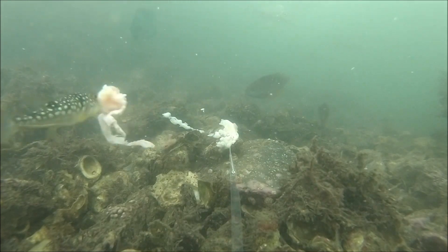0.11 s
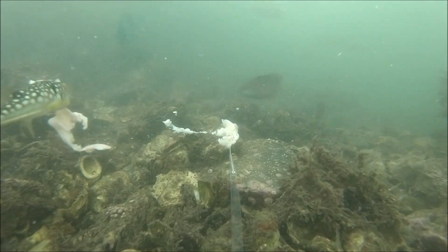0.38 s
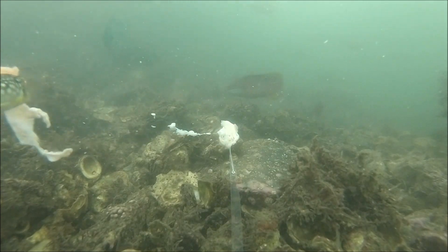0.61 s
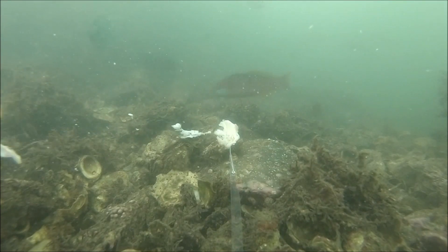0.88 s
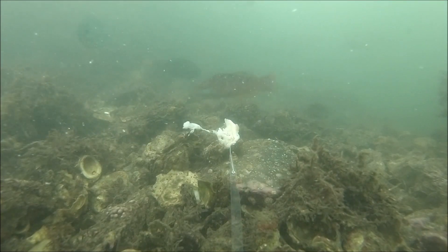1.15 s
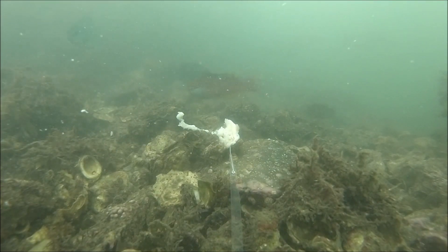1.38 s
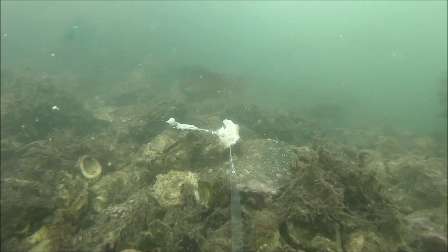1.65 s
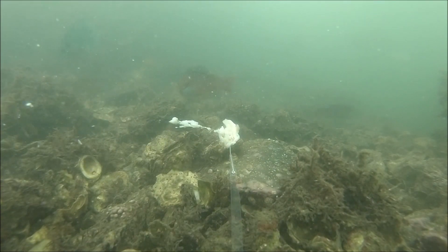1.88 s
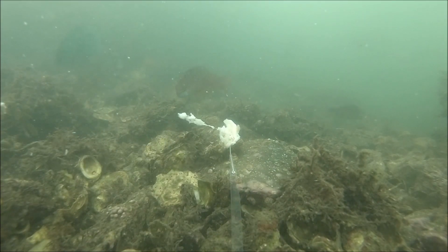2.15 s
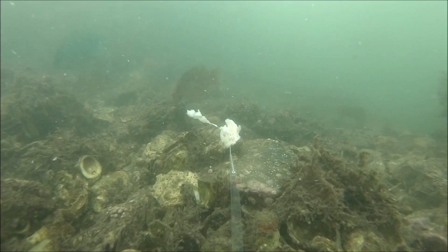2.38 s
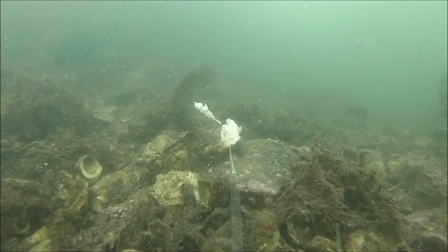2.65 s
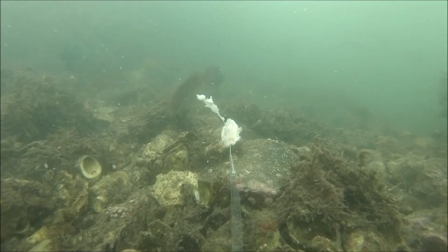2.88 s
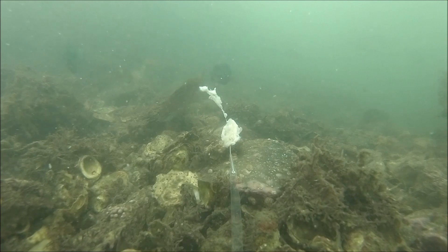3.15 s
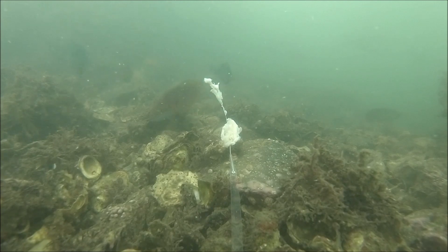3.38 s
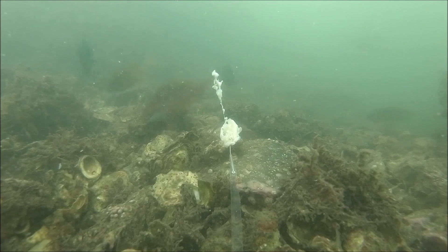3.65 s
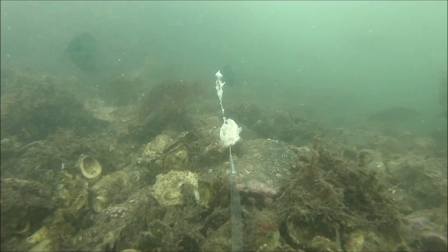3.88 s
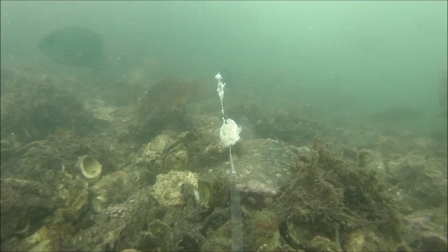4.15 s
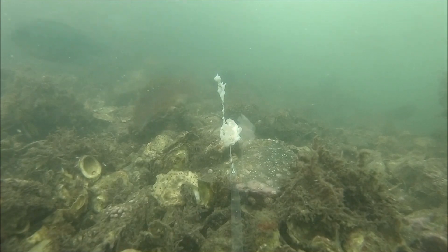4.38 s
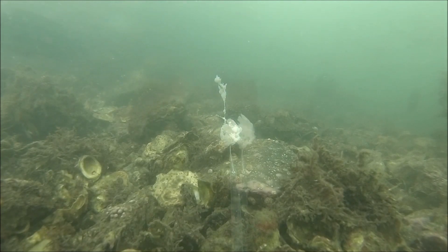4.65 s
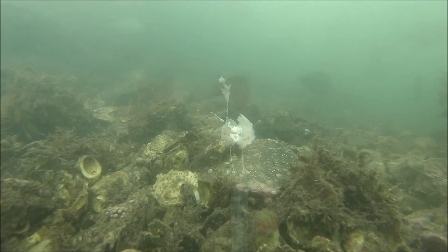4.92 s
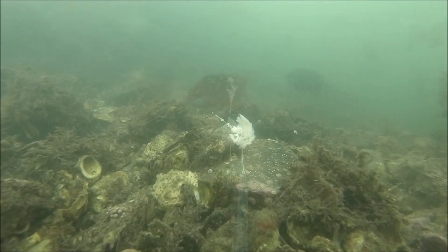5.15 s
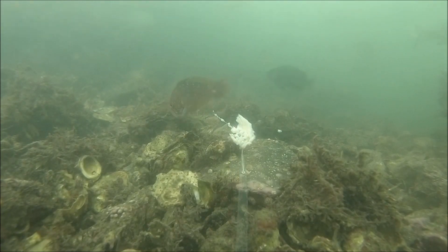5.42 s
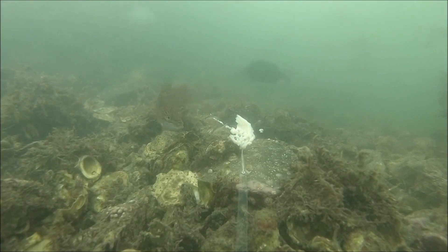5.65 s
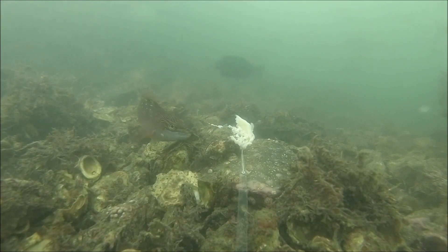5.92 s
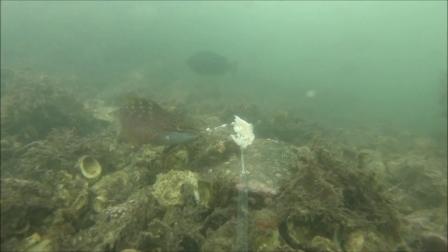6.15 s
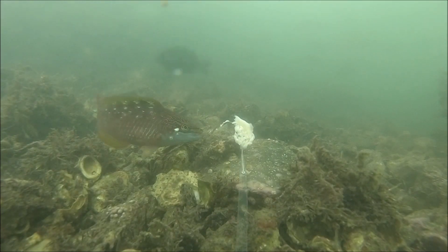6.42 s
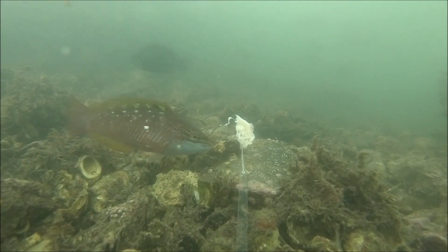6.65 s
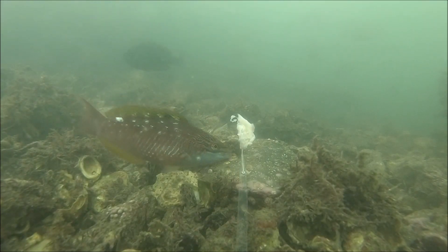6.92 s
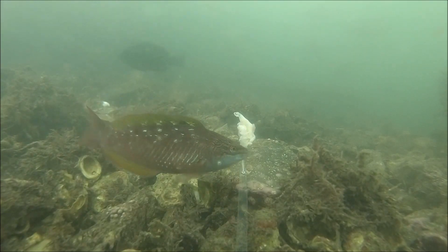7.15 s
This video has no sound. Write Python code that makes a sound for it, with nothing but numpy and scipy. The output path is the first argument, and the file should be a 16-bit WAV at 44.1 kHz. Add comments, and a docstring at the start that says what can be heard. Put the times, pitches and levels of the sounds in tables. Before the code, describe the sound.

Underwater on a shallow shell bed, nearby snapping shrimp fire hard, irregular clicks, the loudest around one second. Two soft low thumps fall near three seconds around a lull, then the snaps crowd together before thinning to faint ticks. Distant crackle, hiss and rumble continue throughout, heard in stereo from inside a sealed camera housing that gives each snap a short, boxy ring.

```python
"""Snapping shrimp over a shallow shell bed, heard by two microphones inside a sealed camera housing.
Near snaps crackle from the start, each a cluster of echoes that rings the housing; after the loudest, at 1 s,
the level dips briefly. Soft thumps fall at 2.9 and 3.6 s, on either side of a lull in the near snaps.
They crowd together from 4.2 to 5.6 s, then thin out as the hiss sinks. Throughout, far snaps tick and
blur into a hiss, over a wavering rumble and a faint two-tone hum, both shaped from noise and sines."""
import sys
import numpy as np
from scipy import signal
from scipy.fft import rfft, irfft, next_fast_len
from scipy.io import wavfile
from scipy.ndimage import uniform_filter1d

SR = 44100
rng = np.random.default_rng(int(sys.argv[2]) if len(sys.argv) > 2 else 0)


def amplitude_ratio(level_db):
    """Convert a level in decibels to the matching linear amplitude (field) ratio."""
    exponent = np.asarray(level_db, float) / 20
    return 10 ** exponent


def wav_record(signal):
    """Record a signal, one row per channel, as 16-bit PCM in the file named by sys.argv[1]."""
    frames = np.transpose(np.atleast_2d(signal))
    bounded = np.clip(frames, -1, 1)
    # unit amplitude maps onto the largest positive 16-bit level
    quanta = np.round(bounded * 32767).astype(np.int16)
    wavfile.write(sys.argv[1], SR, quanta)


N = 321489  # samples, 7.29 s
RING = 4096  # samples given to one snap or thump


def curve(hz, table, column=1):
    """Reads a table column over log frequency."""
    table = np.array(table)
    return np.interp(np.log(hz + 1e-9), np.log(table[:, 0]), table[:, column])


def mode(f, hz, width):
    """Response of one resonance, gain 1 at its centre."""
    return 1j * f * width / (hz ** 2 - f ** 2 + 1j * f * width)


def walk(rate):
    """Random levels held 1 / rate s and slewed twice, scaled to spread 1."""
    hold = int(SR / rate)
    steps = np.repeat(rng.standard_normal(N // hold + 1), hold)
    x = uniform_filter1d(uniform_filter1d(steps, hold), hold)[:N]
    return x / x.std()


def noise(gain):
    """Two unrelated noises of one colour, rms 1."""
    size = next_fast_len(N)
    spectrum = rfft(rng.standard_normal((2, size))) * gain(np.fft.rfftfreq(size, 1 / SR))
    x = irfft(spectrum, size)[:, :N]
    return x / x.std()


def colour(table):
    """Gain of a spectrum that closes at both ends of its table."""
    return lambda f: amplitude_ratio(curve(f, table)) * (f > table[0][0]) * (f < table[-1][0])


# Snaps close to the housing, each level as if its energy filled 5 ms, ahead of the port balance:
# (t/s, body ring level/dB, low ring over body/dB, treble ring over body/dB, echo spread/ms)
NEAR_SNAPS = [(0.0361, -59.5, -7, 19.0, 1.5), (0.1603, -21, -8.5, -25.5, 1.83),
              (0.2491, -29, -14.5, -9, 3.5), (0.2567, -40, 1, 11, 1.1), (0.2756, -42.5, -9.0, -5, 6.1),
              (0.2905, -44.5, -18.0, 6.5, 2.2), (0.432, -72, 27.5, 2.0, 5.1), (0.4855, -46.5, -3, 3, 3.4),
              (0.6622, -28.5, -12, -9, 2.5), (0.7129, -33.5, -12, -2, 3.3),
              (0.7254, -42.5, -18, -15.5, 3.7), (0.7721, -28, -19, -5, 2.1), (0.8637, -31, -16.5, -10, 3.7),
              (0.9037, -54, -9.0, 6.5, 3.6), (0.9286, -45.5, -2.5, 3.5, 2.9), (0.955, -52, -13, 0, 4.2),
              (0.9701, -19.5, -11.0, -9.5, 2.1), (1.0025, -41.0, -6, -10, 12), (1.025, -41.5, -5, 3, 10.3),
              (1.0434, -11, -8.5, -14.5, 1.2), (1.1358, -48.5, -13, -0.5, 2), (1.1975, -39.0, -32, 4, 2.3),
              (1.2073, -40, -13.0, -2, 3.7), (1.3074, -51, -3.0, 5, 1.6), (1.4403, -28.5, -10.5, -17, 3.1),
              (1.5053, -43.5, -6, -20, 3.3), (1.563, -27.5, -5.5, -17, 3.1), (1.591, -47, -25, 5.5, 1.4),
              (1.5972, -49.5, -9, 7.5, 2.2), (1.7372, -44.5, 3, 1.5, 5.9), (1.7496, -12, -10, -18, 1.3),
              (1.9123, -57, -10.0, 7.5, 5.3), (2.0376, -31, -8, -19, 2.8), (2.0446, -34.5, -19, -0.5, 3.2),
              (2.2331, -53.5, -30, 5, 3.6), (2.293, -48.5, -5, -22, 7.8), (2.3135, -52.5, -7, 11.5, 2.1),
              (2.372, -20.0, -3, -8.5, 2.9), (2.7062, -27, -16, -9.5, 3.4), (2.7369, -34, -5.5, -16, 3.9),
              (2.7776, -38, -12, -8.5, 6.6), (2.8207, -48, -6, 0.5, 3.0), (2.8417, -37, -11.5, 1.0, 1.6),
              (2.8832, -40, -18, -4, 2.2), (2.8912, -33.5, -18, 0.5, 3), (2.9201, -41, -19.5, -9, 3.5),
              (2.934, -27.0, -20.5, -3, 2.7), (2.9959, -52.5, -10.0, 2, 4.8),
              (3.544, -58.5, 11.5, -12, 5.5), (3.5803, -33, -9.5, 1.5, 1.24), (3.6771, -37, -14, -1, 4.3),
              (3.7121, -25.5, -6, -6.5, 3.2), (3.7412, -53.0, -1.0, 8, 1.8), (3.749, -56, 5, 14, 5.7),
              (3.7791, -40.5, -6.5, -2.5, 3.4), (3.864, -62, -18, 15, 2.7), (4.0136, -53.5, -18, 5, 2),
              (4.1183, -71.5, 23.5, 19, 7.1), (4.2253, -46, 2.0, 4.5, 1.3), (4.2357, -26.5, -7.5, -15, 2.3),
              (4.3153, -67, 12, 12, 6.1), (4.3266, -49, -1, -1.0, 2.1), (4.3791, -20.5, -8, -19, 1.8),
              (4.3832, -27.5, -15, -0.5, 1.6), (4.4115, -43.5, -1.5, -6, 7.7),
              (4.4268, -19, -7.5, -8, 2.76), (4.4863, -26.5, -13.5, -5, 2.2),
              (4.5383, -46.5, -3.5, 4.5, 3.1), (4.5475, -31.5, -12.5, -10, 4.6),
              (4.5811, -19.5, -4.5, -20.5, 1.44), (4.589, -34.0, 2, -0.5, 2.3), (4.596, -32, 5.5, -2, 7.9),
              (4.6103, -27.5, 1.5, -8, 4), (4.6559, -43.5, -2.5, 8.5, 2.3), (4.6766, -51.0, -5, 2.5, 11.1),
              (4.702, -68.5, 20, 14.5, 8.6), (5.0027, -46.0, 4.5, 3, 3.6),
              (5.0208, -23, -11.5, -15.5, 0.78), (5.0456, -46.5, -12, 1, 3.8),
              (5.0763, -27, -22.5, -1.5, 1.7), (5.2156, -36.5, -7.5, -3.5, 4.5),
              (5.231, -40, -20, -14.0, 2.7), (5.2353, -26.5, -16.5, -7, 2.4), (5.251, -36.5, -4, -6, 16),
              (5.2652, -29.5, -8, 0.0, 1.9), (5.2989, -53.5, 7, 10, 3.7), (5.3461, -35.5, -1, -2, 5),
              (5.3743, -21, -6.5, -9, 2.5), (5.3873, -22.5, -10.5, -10, 1.4), (5.4712, -43, -1, -2, 10),
              (5.4818, -32.5, -24.5, -4, 3.3), (5.4878, -40, -13, 4.5, 3.9), (5.512, -46, -6, -21, 8.6),
              (5.5257, -34.5, -22, -6.0, 4.9), (5.588, -53.5, -0.5, -19, 11),
              (5.6964, -38.5, -2.5, -6.0, 2.14), (5.818, -47.5, -15.5, 8, 2.2),
              (5.8811, -42, -26.5, -7.5, 2.7), (6.0168, -38, 0.5, -6, 2.1), (6.1879, -42, -14, 2.5, 2.3),
              (6.2027, -41, -27, 3.5, 3.4), (6.2754, -42.5, -16, 4.5, 3.2), (6.2912, -44.5, -9, 9.5, 3),
              (6.3139, -39.5, -22, -8, 2.0), (6.4115, -51, -10.0, -6.5, 3.9), (6.6193, -70.5, -10, 25, 2.1),
              (6.6229, -76.5, 0.5, 25, 6), (6.8367, -54.0, -15.5, 1, 6.7), (6.9652, -47.5, -8.5, 9.5, 1.23),
              (7.0543, -37.5, -17, -3.5, 2.7), (7.1352, -55, -15.5, 10, 1.4), (7.2394, -59.5, -4, 7.5, 4.6)]


def near_snaps():
    """Nearby shrimp: each snap is timed, levelled and given its own echo spread."""
    return snaps(NEAR_SNAPS)


def snaps(rows):
    """Arrivals of every snap ring three groups of housing modes, each brought to its own level."""
    f = np.fft.rfftfreq(RING, 1 / SR)
    groups = housing_modes(f)
    angle_db, top_hz = 2, 11000
    out = np.zeros((2, N + RING))
    for s, body_db, low_db, treble_db, spread_ms in rows:
        sound = arrivals(f, spread_ms)
        # the direction of the snap sets how strongly it drives each mode
        low, body, treble = (amplitude_ratio(angle_db * rng.standard_normal(len(modes))) @ modes for modes in groups)
        # a snap rich in lows rings the body lower, a bright one higher
        centre_hz = np.clip(2240 - 29.5 * low_db + 9.5 * treble_db, 1950, 2920)
        body = body * mode(f, centre_hz, 840)
        # each snap's top is softened by a random amount, more where its treble is weak
        dulling_db = 0.22 * min(treble_db, 0) + 4.0 * rng.standard_normal()
        treble = treble / (1 + 1j * f / (top_hz * amplitude_ratio(dulling_db)))
        start = int(s * SR)
        for db, ring in ((low_db, low), (0, body), (treble_db, treble)):
            part = irfft(sound * ring, RING)
            rms_5ms = np.sqrt(np.sum(part ** 2, axis=1, keepdims=True) / (SR / 200))
            out[:, start:start + RING] += amplitude_ratio(body_db + db) * part / rms_5ms
    return out[:, :N]


def arrivals(f, spread_ms, rise=0.32, pack=0.81, ragged_db=4.5, echo_db=3.5):
    """Spectrum of a ragged burst of arrivals off shells and surface, then a faint dull wash."""
    tail_db, tail_ms, tail_hz = -43, 20, 4000
    ms = np.arange(RING) * 1000 / SR
    grain, ragged, wash_grain = rng.standard_normal((3, 2, RING))
    echoes = np.repeat(ragged[0, ::32], 32)  # held 32 samples, the same at both microphones
    rough = grain * amplitude_ratio(ragged_db * ragged + echo_db * echoes)
    fade = np.exp(-(ms / (pack * spread_ms)) ** 0.79)
    burst = rough * fade * (1 - np.exp(-ms / (rise * spread_ms)))
    # snaps with a longer burst leave more wash, short ones hardly any
    wash = amplitude_ratio(tail_db) * min(spread_ms, 4.5) ** 2 * wash_grain * np.exp(-ms / tail_ms)
    return rfft(burst) + rfft(wash) / (1 + 1j * f / tail_hz)


# Resonances of the sealed housing in three groups, levels ahead of the wall and of each snap's scaling:
# (f/Hz, width/Hz, level/dB)
LOW_MODES = [(740, 370, -9.5), (1235, 230, -3.5)]
BODY_MODES = [(1805, 360, 16), (2350, 1000, 11.5), (2728, 1200, 1), (3000, 170, -14.5)]
TREBLE_MODES = [(5180, 1300, 22.5), (5900, 3000, 6), (8300, 830, -29), (11000, 5600, -29)]


def housing_modes(f):
    """Housing resonances behind walls that pass little between the groups and above the last one."""
    low_wall = mode(f, 1100, 710)
    body_wall = mode(f, 2450, 2200) ** 2
    treble_wall = mode(f, 7200, 4600) / (1 + 1j * f / 11000) ** 3
    walls = low_wall, body_wall, treble_wall
    return [wall * np.array([amplitude_ratio(db) * mode(f, hz, width) for hz, width, db in group])
            for wall, group in zip(walls, (LOW_MODES, BODY_MODES, TREBLE_MODES))]


def far_snaps(treble_db=-71.5, scatter_db=4.2, count=560):
    """Distant shrimp: faint ticks and blurred knocks at random moments, a few above the rest."""
    u, g = rng.random((count, 3)), rng.standard_normal((count, 2))
    time_s = u[:, 0] * N / SR
    treble = treble_db + np.minimum(-scatter_db * np.log(u[:, 1]), 15)
    body = treble - 10 + 3.5 * g[:, 0]
    low_over_body = -3 + 4 * g[:, 1]
    spread_ms = 1.1 + 7 * u[:, 2] ** 2
    return snaps(np.c_[time_s, body, low_over_body, treble - body, spread_ms])


# Soft knocks, equal at both microphones: (t/s, peak level/dB, f/Hz)
KNOCKS = [(2.926, -52.5, 256), (3.626, -46, 192)]


def thumps(cycles=1.7, rise_ms=1.4):
    """Soft low knocks: sines that die away within a few cycles."""
    out, t = np.zeros(N + RING), np.arange(RING) / SR
    for s, db, hz in KNOCKS:
        fade = np.exp(-t * hz / cycles) * (1 - np.exp(-t * 1000 / rise_ms))
        knock = np.sin(2 * np.pi * hz * t) * fade
        start = int(s * SR)
        out[start:start + RING] += amplitude_ratio(db) * knock / knock.max()
    return out[:N]


# Background of the water, levels about which it flickers: (t/s, hiss level/dB, rumble level/dB)
WATER_LEVELS = [(0, -56.5, -57), (.8, -59.5, -55.5), (1.6, -60.5, -57), (2.2, -61.5, -61.5),
                (3.3, -58.5, -60), (4.4, -57.5, -55), (5.402, -60, -54.5), (5.801, -69.5, -57),
                (6.701, -74, -56), (7.29, -66, -58)]


def water():
    """Hiss, fine hiss and rumble of the surrounding water, following slow level curves."""
    s, *columns = np.transpose(WATER_LEVELS)
    hiss_db, rumble_db = (np.interp(np.arange(N) / SR, s, column) for column in columns)
    return hiss(hiss_db) + fine_hiss(hiss_db) + rumble(rumble_db)


# Hiss spectrum coloured by the housing, relative density: (f/Hz, level/dB per Hz)
HISS_COLOUR = [(550, -12.5), (740, 1.5), (1000, -15.5), (1290, -8.5), (2000, -12), (2320, -1.5),
               (2750, -6.5), (3340, -10), (3800, -40)]


def hiss(level_db):
    """Noise coloured by the housing, its level flickering."""
    return amplitude_ratio(level_db + 1.3 * walk(29)) * noise(colour(HISS_COLOUR))


# Fine hiss spectrum, relative density: (f/Hz, level/dB per Hz)
FINE_COLOUR = [(3500, -10), (4500, -9.5), (5500, -4), (6600, -4.5), (8400, -14), (12400, -15),
               (14200, -24.5), (16000, -63)]


def fine_hiss(hiss_db, fine_db=-72, follow=0.23):
    """Flickering treble noise that partly follows the hiss level."""
    level_db = fine_db + follow * (hiss_db - hiss_db.mean())
    return amplitude_ratio(level_db + 1.2 * walk(50)) * noise(colour(FINE_COLOUR))


# Rumble spectrum, relative density: (f/Hz, level/dB per Hz)
RUMBLE_COLOUR = [(20, -12), (100, -17), (150, -3), (185, -1.5), (270, -13), (530, -26), (740, -20.5),
                 (950, -23.5), (2000, -42), (3600, -37.5)]


def rumble(level_db):
    """Mostly low noise that swells and wavers."""
    return amplitude_ratio(level_db + 1.5 * walk(6)) * noise(colour(RUMBLE_COLOUR))


# Thin tones, equal at both microphones, about which pitch and level waver: (f/Hz, level/dB, waver/dB)
HUM_TONES = [(62, -75, 2), (176.2, -69.5, 5.5)]


def hum(drift=0.0054):
    """Two thin sine tones that waver in level and pitch."""
    out = np.zeros(N)
    for hz, db, waver_db in HUM_TONES:
        phase = 2 * np.pi * np.cumsum(hz * (1 + drift * walk(6.9))) / SR
        out += amplitude_ratio(db + waver_db * walk(3)) * np.sin(phase)
    return out


# Left microphone port against right: (f/Hz, left lead/rad, likeness 0-1, left minus right level/dB)
PORT_PAIR = [(60, 3.4, .3, 1), (170, 3.4, .6, 2), (380, 2.8, .2, 0), (700, 2.0, .8, -4.5),
             (1250, 2.0, .85, 4), (1600, 1.0, .5, -8), (2300, 0, .95, -.5), (2850, .7, .75, -3),
             (3300, 1.5, .85, 2.5), (3900, .8, .25, -3), (5000, 4.1, .8, -7), (5500, 5.6, .45, -10),
             (6200, 7.5, .3, 2.5), (6900, 9.9, .7, 0), (9000, 10.8, .3, -1)]


def microphone_ports(own, shared):
    """The left port hears the right port's sound turned in phase, plus sound of its own."""
    size = next_fast_len(N + RING)
    f = np.fft.rfftfreq(size, 1 / SR)
    own, right = rfft(own, size), rfft(shared, size)
    alike = np.clip(curve(f, PORT_PAIR, column=2), 0, 1)
    tilt = amplitude_ratio(curve(f, PORT_PAIR, column=3) / 2)
    left = alike * np.exp(1j * curve(f, PORT_PAIR)) * right + np.sqrt(1 - alike ** 2) * own
    return irfft(np.array([left * tilt, right / tilt]), size)[:, :N]


def scene():
    """Snaps and water reach the two ports; thumps and hum add equally to both."""
    own, shared = near_snaps() + far_snaps() + water()
    return microphone_ports(own, shared) + thumps() + hum()


def top_cut(x):
    """Nothing passes above the cut-off."""
    return signal.sosfilt(signal.butter(12, 16500, fs=SR, output="sos"), x)


# One brief sag in level after the loudest snap: (centre t/s, half width/s, level/dB)
LEVEL_SAG = (1.106, 0.03, -10)


def record(dry):
    """The level sags once and comes back; a tanh curve rounds the highest peaks."""
    centre, half, db = LEVEL_SAG
    t = np.arange(N) / SR
    sag = amplitude_ratio(db * np.exp(-((t - centre) / half) ** 4))
    mix = 1.053 * np.tanh(dry * sag / 1.108)
    return top_cut(mix)


dry = scene()
out = record(dry)
wav_record(out)
```